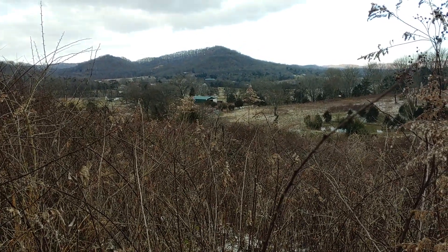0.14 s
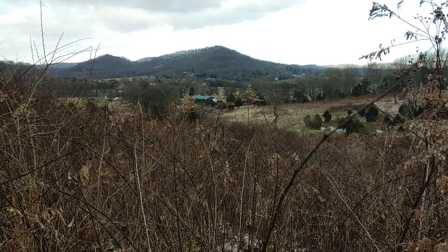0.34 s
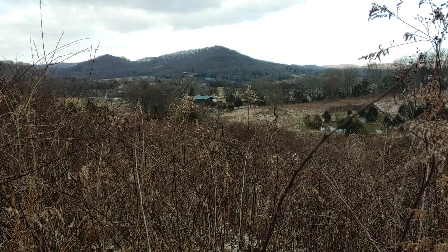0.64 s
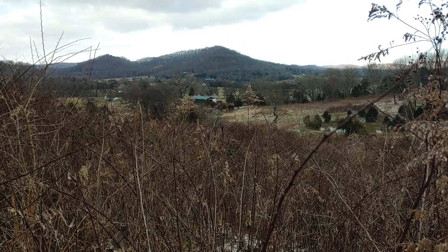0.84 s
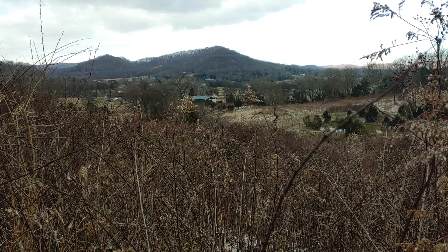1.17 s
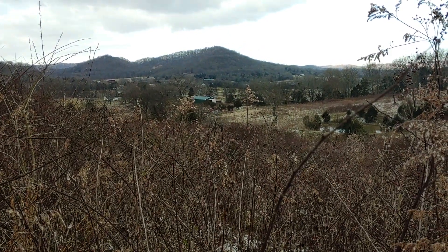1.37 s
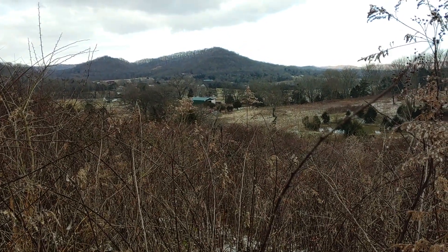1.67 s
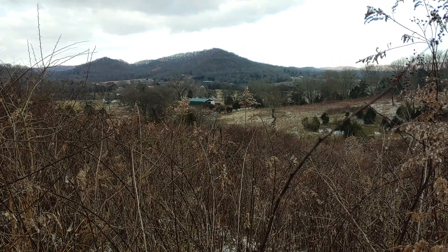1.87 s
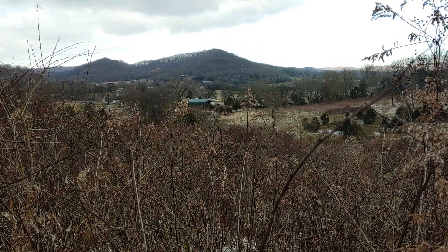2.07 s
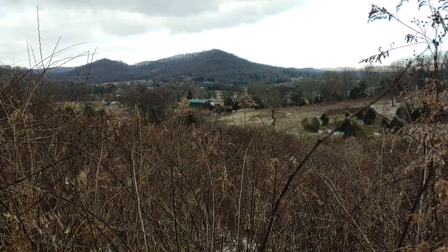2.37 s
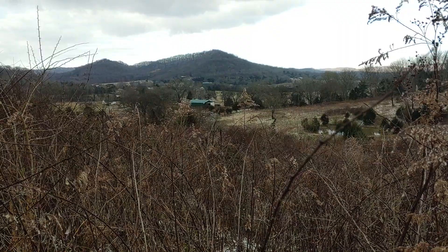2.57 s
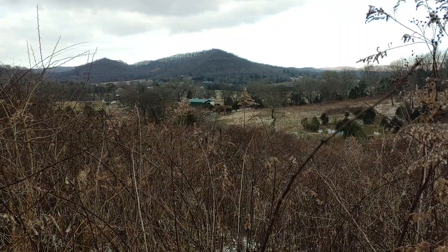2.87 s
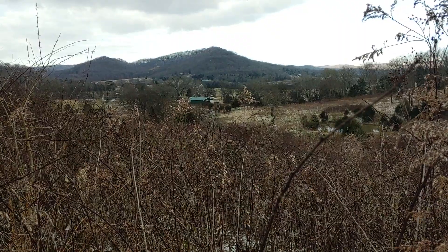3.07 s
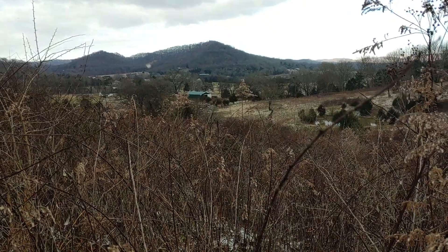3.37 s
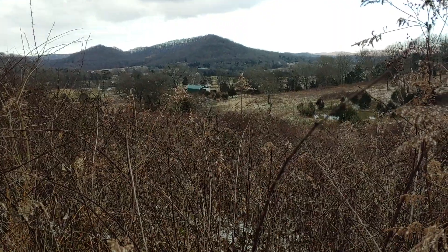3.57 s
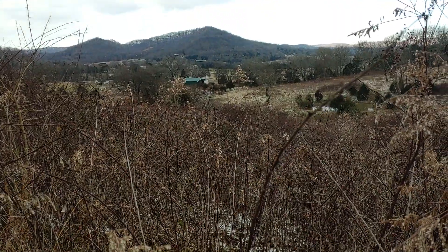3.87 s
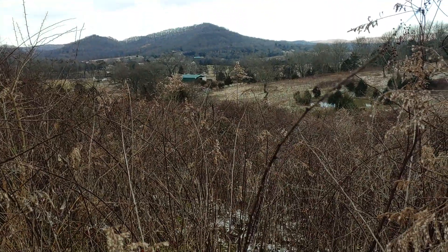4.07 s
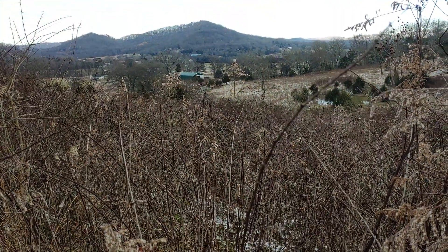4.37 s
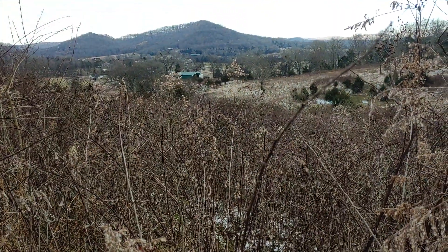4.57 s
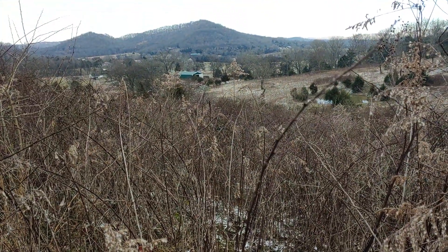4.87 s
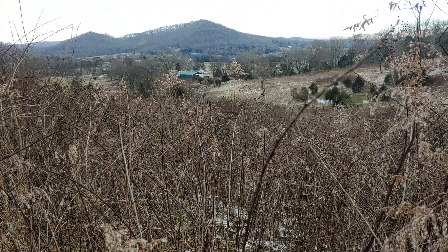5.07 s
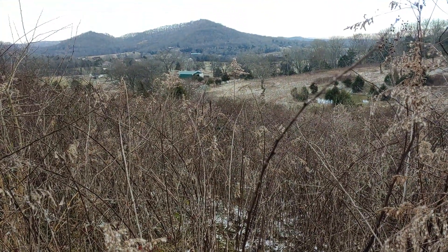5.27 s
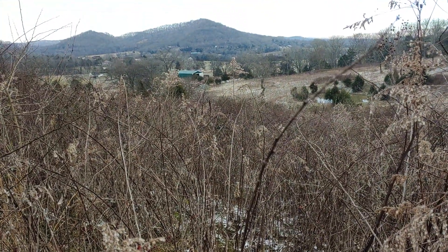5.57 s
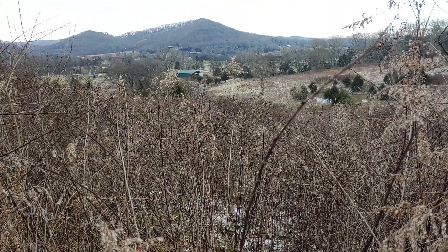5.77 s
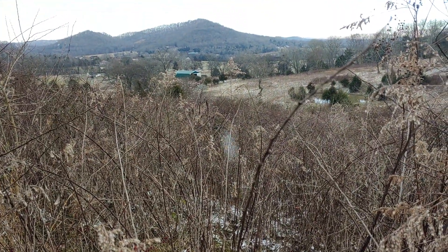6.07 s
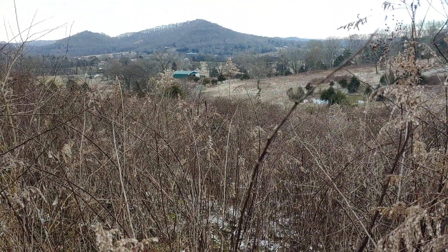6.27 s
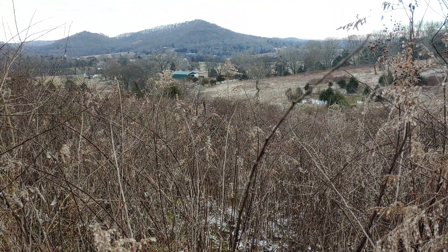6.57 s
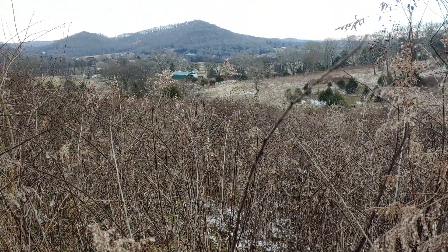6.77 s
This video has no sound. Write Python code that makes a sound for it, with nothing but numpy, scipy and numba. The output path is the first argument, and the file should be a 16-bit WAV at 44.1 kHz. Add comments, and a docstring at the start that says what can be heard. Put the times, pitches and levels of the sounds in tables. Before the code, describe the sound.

Drawn-out, increasingly hoarse baying from a dog echoes outdoors over dull thumps of wind on the microphone.

```python
"""A hound in a cold field

A hound bays seven times, growing hoarse: its vocal folds pulse unevenly and ring its throat and mouth.
The hills send back a long, dull echo. Gusts thump the left and right microphone openings separately.
Dry stalks rustle, tick and creak, and a small bird chirps once over the hush of distant air."""
import sys
import numpy as np
from scipy import signal
from scipy.fft import rfft, irfft, next_fast_len
from scipy.io import wavfile
from scipy.ndimage import uniform_filter1d
from numba import njit

SR = 44100
rng = np.random.default_rng(int(sys.argv[2]) if len(sys.argv) > 2 else 0)


def wav_record(signal):
    """Record a signal, one row per channel, as 16-bit PCM in the file named by sys.argv[1]."""
    frames = np.transpose(np.atleast_2d(signal))
    bounded = np.clip(frames, -1, 1)
    # unit amplitude maps onto the largest positive 16-bit level
    quanta = np.round(bounded * 32767).astype(np.int16)
    wavfile.write(sys.argv[1], SR, quanta)


N = 306054
TIME = np.arange(N) / SR

# One row a bay (a long bark): start/s, end/s, mouth/dB, growl/dB, ring/dB, whistle/dB, whistle rise/s,
# how far the ring follows the rasp/0-1, upper ring lift/dB, lower whistle lift/dB, palate strength
BAYS = [(0.828, 1.636, -10.5, -26.5, -9.5, -35.5, 0.17, 1, 1, 12, 0.023),
        (2.187, 2.848, -7.5, -18, -15, -34, 0.22, 0, 3, -3.5, 0.38),
        (3.214, 3.748, -6, -15.5, -15.5, -34.5, 0.33, 0.56, -0.5, -6.5, 0.86),
        (4.01, 4.663, -4.5, -9.5, -14.5, -38.5, 0.21, 0.26, -12.5, -4.5, 0.98),
        (5.056, 5.575, -5, -14, -6, -43.5, 0.061, 0.1, -12, 6.5, 0.71),
        (5.844, 6.129, -8.5, -10, -2.5, -31, 0.11, 0.08, -5.5, -1, 1.4),
        (6.894, 7.199, -8.5, -16.5, -11, -28, 0.064, 0.37, -1.5, -2, 2.9)]
# How hard the dog pushes, one list a bay: t/s, pitch/Hz, level/dB, rasp/dB, roughness (about 0-1)
BAY_EFFORT = [
    [(.855, 730.3, -28.5, -31, 0.46), (.91, 626.7, -21.5, -21, 0.54), (.99, 583.8, -24, -28.5, 0.55),
     (1.03, 662.5, -21.5, -15.5, 0.43), (1.12, 649, -24.5, -23, 0.53), (1.19, 527.9, -31.5, -23, 1.02),
     (1.3, 560, -28.5, -11, 0.73), (1.34, 656, -24, -14.5, 0.55), (1.41, 638, -25.5, -11, 0.46),
     (1.48, 549.4, -28.5, -16, 0.53), (1.51, 597, -31, -6.5, 0.26), (1.61, 541.7, -29.5, -33.5, 0.5)],
    [(2.21, 542, -28, -17.5, 0.77), (2.25, 599, -20.5, -20, 0.44), (2.47, 549.7, -22, -33, 0.57),
     (2.52, 600.5, -22.5, -24.5, 0.59), (2.69, 649.4, -21, -28.5, 0.51), (2.81, 546.8, -23.5, -20.5, 0.46)],
    [(3.24, 561.5, -25, -9.5, 0.57), (3.37, 547.5, -19.5, -20, 0.5), (3.49, 616.7, -22, -33, 0.66),
     (3.6, 574.4, -25.5, -22, 0.74), (3.71, 532.3, -34, -13, 0.79)],
    [(4.04, 602.6, -22, -19, 0.54), (4.1, 547.3, -23, -14, 0.55), (4.3, 559, -22, -24, 0.54),
     (4.4, 544, -25, -33.5, 0.5), (4.62, 513, -28.5, -17.5, 0.51)],
    [(5.1, 635.8, -27.5, -12.5, 0.65), (5.14, 541.6, -23.5, -45, 0.6), (5.2, 538, -30, -20, 0.56),
     (5.45, 517.2, -30.5, -26.5, 0.54), (5.55, 515.8, -35.5, -9, 0.75)],
    [(5.88, 541.6, -32, -17.5, 0.56), (5.95, 573, -24.5, -23.5, 0.65), (6.04, 518.8, -32.5, -20.5, 0.43),
     (6.1, 503, -55, -4, 0.55)],
    [(6.915, 571.7, -27.5, -14, 0.46), (6.94, 575, -34, -4.5, 0.86)],
]
# The moving jaw retunes the voice: t/s, mouth/Hz, rasp/Hz, lowest whistle/Hz
JAW_MOVES = [
    [(1.07, 1274, 1872, 4445), (1.18, 930, 1900, 4390), (1.32, 1006, 2061, 4130), (1.47, 1197, 1970, 4210)],
    [(2.25, 1205, 2110, 4180), (2.59, 892, 2010, 4020), (2.8, 1187, 2005, 4560)],
    [(3.26, 1234, 1976, 4100), (3.49, 917, 1978, 4390)],
    [(4.07, 1355, 1900, 4150), (4.35, 920, 1987, 4080), (4.6, 1133, 1988, 4080)],
    [(5.1, 1324, 2040, 4450), (5.2, 945, 2010, 4206)],
    [(5.9, 1154, 1973, 4110), (6.0, 1064, 1940, 3960)],
]
def hound():
    """A strong throat tone carries each bay; growl, mouth, rasp, ring and whistle colour it."""
    bays = np.array(BAYS)
    nearest = np.searchsorted((bays[1:, 0] + bays[:-1, 1]) / 2, TIME)
    (start_s, end_s, mouth_db, growl_db, ring_db, whistle_db,
     rise_s, follows, upper_db, lower_db, palate) = bays[nearest].T
    since_s, left_s = TIME - start_s, end_s - TIME
    pitch_hz, level_db, rasp_db, rough = in_time(np.concatenate(BAY_EFFORT))
    mouth_hz, rasp_hz, whistle_hz = in_time(np.concatenate(JAW_MOVES))
    starting, ending = fade(since_s, over_s=.02), fade(left_s, over_s=.038)
    jaw_shut, yelp = fade(since_s, over_s=.058), fade(since_s, over_s=.1)
    hoarse = np.minimum(TIME / 3.5, 1) ** 2
    clear = 1 - .8 * hoarse   # hoarseness blurs the growl and the yelp

    full_effort_db = -22.5
    slack_db = full_effort_db - level_db   # less effort brings out the mouth and the growl
    mouth_db = mouth_db + .42 * slack_db - 8 * jaw_shut
    growl_db = growl_db + .58 * slack_db + 23 * (rough - .37)
    ring_db = ring_db + full_effort_db + follows * (rasp_db - full_effort_db)
    # the whistle swells, then thins out as breath runs short
    whistle_db = whistle_db - 19 * fade(since_s, rise_s) - 7 * fade(left_s, over_s=.083)

    sung_hz = pitch_hz - 60 * starting   # each bay slides up to its note
    voice = throat(vocal_folds(sung_hz, np.clip(rough, 0, 1)))
    treble = band(voice, 2200, 6700)
    breathy = breathy_voice(voice, breath=1.3 * rough * hoarse)
    parts = (band(voice, 433, 812)
             + amp(growl_db) * growl(voice, pitch_hz, clear)
             + amp(mouth_db) * mouth(breathy, mouth_hz, palate)
             + amp(rasp_db) * rasp(voice, rasp_hz, yelp, clear)
             + amp(ring_db) * throat_ring(treble, since_s, upper_db + 5.5 * yelp)
             + amp(whistle_db) * whistle(treble, whistle_hz, lower_db))
    sounding = uniform_filter1d(1. * (since_s > 0) * (left_s > 0), size=200)
    return amp(level_db - 22 * starting - 17 * ending) * sounding * parts


def vocal_folds(pitch_hz, rough):
    """The folds let out shaky pulses of air, every other one weak, each with a puff of hiss."""
    shaky = 1 + rough * (.185 * rough * drift(119.3)[0] + .045 * drift(25)[0])
    phase = 2 * np.pi * np.cumsum(pitch_hz * shaky) / SR
    pulses = sum(np.cos(k * phase) for k in range(1, 12))
    half_pitch = np.cos(phase / 2)   # the strong-weak swing is also heard as a low tone
    strength = 1 + .52 * rough * half_pitch + .5 * rough * drift(390)[0]
    breath = rng.standard_normal(N) * (1 + np.cos(phase))
    return pulses * strength + .064 * half_pitch + 9.63 * rough ** 2 * breath


# What the throat lets through: f/Hz, level/dB
THROAT_COLOUR = [(260, -29), (430, -22.5), (540, 2.5), (710, -0.5), (1060, -15.5), (1600, -17), (1960, -31),
                 (7300, -44.5), (7800, -67.5)]
def throat(x):
    """The air in the throat and mouth boosts some overtones and muffles others."""
    return filtered(x, lambda hz: amp(at_hz(THROAT_COLOUR, hz)))


def growl(voice, pitch_hz, clear):
    """Uneven pulses gather into a low growl at half the pitch."""
    return peaked(band(voice, 194, 395), pitch_hz / 2, width_hz=50, peak=3 * clear)


def breathy_voice(voice, breath):
    """Hoarse breath mixes into the middle range of the voice."""
    return band(band(voice, 839, 1600) + breath * band(rng.standard_normal(N), 800, 1586), 833, 1633)


def mouth(x, mouth_hz, palate):
    """The palate (roof of the mouth) rings at one pitch; the mouth's own ring moves with the jaw."""
    palate_ring = resonance(resonance(x, 1617, 130), 1617, 130)
    return peaked(x + 2 * palate * palate_ring, mouth_hz, width_hz=200, peak=.79)


def rasp(voice, rasp_hz, yelp, clear):
    """A harsh ring starts high and drops, so the bay opens with a yelp."""
    peak = 1.3 * (1 + 6 * yelp * clear)
    return peaked(band(voice, 1705, 2403), rasp_hz + 450 * yelp, width_hz=130, peak=peak)


# Where the upper throat rings: f/Hz, width/Hz, level/dB
RING_PEAKS = [(2886, 130, 9.5), (3349, 180, 0.5)]
def throat_ring(treble, since_s, upper_db):
    """The upper throat rings at two pitches; the lower sinks through each bay."""
    sag = 1 - .07 * np.clip(since_s, 0, 1)
    return cavities(treble, RING_PEAKS, sway_db=2.5, lifts_db=[0, upper_db], shifts=[sag, 1])


# Where the teeth and nose whistle: f/Hz, width/Hz, level/dB
WHISTLE_PEAKS = [(4050, 250, -2.5), (4800, 320, -6), (5350, 180, -25), (6280, 600, 8.5)]
def whistle(treble, lowest_hz, lower_db):
    """Breath whistles through teeth and nose; the jaw moves the two lowest pitches."""
    shift = lowest_hz / WHISTLE_PEAKS[0][0]
    lifts_db = [lower_db, lower_db, lower_db, 0]
    return cavities(treble, WHISTLE_PEAKS, sway_db=3, lifts_db=lifts_db, shifts=[shift, shift, 1, 1])


def cavities(x, peaks, sway_db, lifts_db, shifts):
    """Small air pockets ring sharply, each wandering in pitch and loudness."""
    sways = sway_db * drift(7.4, channels=len(peaks))
    wanders = 1 + .01 * drift(6.8, channels=len(peaks))
    out = 0
    for (hz, width, db), sway, wander, lift_db, shift in zip(peaks, sways, wanders, lifts_db, shifts):
        now_hz = hz * wander * shift
        out = out + amp(db + sway + lift_db) * glide(glide(x, now_hz, width), now_hz, width)
    return rms_one(out)


def peaked(x, hz, width_hz, peak):
    """Add a moving ring to x; both flutter as the folds slap unevenly."""
    ring = glide(glide(x, hz, width_hz), hz, width_hz)
    return rms_one((x + peak * ring) * amp(.84 * drift(48)[0]))


# Echoes from near and far slopes: delay/s, level/dB
ECHO_SHAPE = [(0.022, -24), (0.151, -17), (0.401, -23), (0.7, -30), (1.1, -53.5), (1.4, -68.5)]
# The echo's dull tone: f/Hz, level/dB
ECHO_TONE = [(200, -11), (420, 4.5), (520, -3.5), (660, 0.5), (1600, -12.5), (1800, -2), (2800, -12.5),
             (7000, -20)]
def hill_echo(x):
    """Countless reflections come back, fluttering in the restless air and dulled by the long trip."""
    fluttering = x * (.62 + .42 * drift(57)[0])
    delay_s, db = np.transpose(ECHO_SHAPE)
    shape = amp(np.interp(TIME, delay_s, db, left=-200, right=-200)) * np.sqrt(2 / SR)
    shared, separate = rng.standard_normal(N), rng.standard_normal((2, N))
    reflections = rfft(shape * (.25 * shared + 2.69 * separate), next_fast_len(N + 2 * SR))
    return filtered(fluttering, lambda hz: reflections * amp(at_hz(ECHO_TONE, hz)))


# How much louder the left side is: f/Hz, left minus right/dB
LEFT_LOUDER = [(300, 1.5), (450, -4), (950, -2), (1220, -6.5), (1570, 2.5), (2020, 14.5), (2600, 3),
               (4500, 2.5), (8000, 6.5)]
# How far the left side's wave runs ahead: f/Hz, lead/radians
LEFT_AHEAD = [(260, 0.26), (1030, 0.38), (1550, 0.98), (2240, 0.15), (4300, -1.5)]
def direct_path(x):
    """Two bounces cancel narrow bands; the microphone's body shades and delays one side."""
    def response(hz):
        lead = np.interp(hz, *np.transpose(LEFT_AHEAD), left=0)
        left = amp(at_hz(LEFT_LOUDER, hz) / 2) * np.exp(.5j * lead)
        ground = dip(hz, centre_hz=1745, width_hz=53, db=-17.5)
        brush = dip(hz, centre_hz=2490, width_hz=130, db=-10)
        return ground * brush * np.array([left, 1 / left])
    return filtered(x, response)


# The wind's rise and fall: t/s, level/dB, left minus right/dB
WIND_GUSTS = [(0, -54, -20), (.27, -59, 31), (.58, -56, -46), (.68, -79.5, -6), (2.68, -65.5, -0.5),
              (2.95, -41.5, -23), (3.23, -38.5, 34), (3.36, -42.5, -2), (3.5, -23, -7.5), (3.8, -37, 10),
              (4.06, -28.5, 3.5), (4.33, -43, -21.5), (4.42, -64, -5.5), (4.7, -36.5, 32.5),
              (5.26, -73.5, -1), (5.5, -51, -1.5), (5.68, -42, 40.5), (5.9, -29, 10), (6.05, -37, -3),
              (6.43, -73, 31.5), (6.64, -52.5, 16), (6.94, -72, 10)]
# The tone of its rumble: f/Hz, level/dB
RUMBLE_TONE = [(20, -24.5), (40, -3.5), (70, 1), (110, -4.5), (180, -17.5), (300, -33.5), (600, -51.5)]
# Hard swirls of air: t/s, level/dB, left minus right/dB, f/Hz
WIND_THUMPS = [(0.171, -46.5, 25, 150), (0.255, -42, 22, 132), (3.29, -11, -11.5, 75.07),
               (3.404, -11, -36, 81.5), (3.627, -13.5, 33, 119.9), (3.96, -7, 29, 141.1),
               (4.047, -19, -16, 79.9), (4.668, -13, 39.5, 151.3), (5.593, -25.5, 35, 141.5),
               (5.759, -14, 57, 139.9), (5.886, -9.5, 46, 139.3), (5.959, -16, 26, 141.7)]
def wind():
    """Air swirling at each opening rumbles, higher in stronger gusts; the hardest swirls thump."""
    level_db, pan_db = in_time(WIND_GUSTS)
    side_db = level_db + np.array([pan_db / 2, -pan_db / 2])
    noise = coloured(RUMBLE_TONE, alike=.006)
    deep = signal.sosfiltfilt(signal.butter(2, 70, fs=SR, output="sos"), noise)
    rumble = noise - deep + amp(-.3 * (side_db + 23.5)) * deep
    out = amp(side_db + 4.14 * drift(33, channels=2)) * rumble
    t = TIME[:6000]
    swell = t / .0091 * np.exp(1 - t / .01)
    for s, db, pan_db, hz in WIND_THUMPS:
        at = round(s * SR)
        wobbly_time = np.cumsum(1 + 3.5 * uniform_filter1d(rng.standard_normal(len(t)), size=200)) / SR
        thump = swell * np.sin(2 * np.pi * hz * wobbly_time)
        out[:, at:at + len(t)] += panned(amp(db - abs(pan_db) / 2) * thump, pan_db)
    return signal.sosfilt(signal.butter(4, 500, fs=SR, output="sos"), out)


# Where dry stems ring: f/Hz, width/Hz, level/dB
STEM_PEAKS = [(2200, 340, -17), (3920, 1300, 11.5), (6245, 260, 14.5)]
# Sharp ticks that strike the stems: t/s, level/dB
STEM_TICKS = [(4.7497, -63), (5.9416, -46.5), (6.789, -57), (6.9272, -43.5)]
def stalks():
    """Slowly growing rubbing and a few ticks ring the same dry stems; each tick also snaps brightly."""
    rub_db = -91.5 + 2.5 * TIME
    rub = rng.standard_normal((2, N)) * amp(rub_db + 2.8 * drift(40))
    ticks = np.zeros((2, N))
    for s, db in STEM_TICKS:
        at = round(s * SR)
        tick = rng.standard_normal(400) * np.exp(-TIME[:400] / .0036)
        ticks[:, at:at + 400] += panned(amp(db) * tick, db=15.5)
    ringing = sum(amp(db) * resonance(rub + ticks, hz, width) for hz, width, db in STEM_PEAKS)
    snap = amp(-9) * resonance(resonance(ticks, 8500, 5500), 8500, 5500)
    return signal.sosfilt(signal.butter(6, 7300, fs=SR, output="sos"), ringing) + snap


# One short creak: t/s, slip rate/Hz, level/dB
STEM_CREAK = [(6.605, 470, -82), (6.615, 470, -43.5), (6.628, 468, -55), (6.638, 465, -75)]
def creak():
    """A stalk sticks and slips so evenly that it buzzes."""
    slip_hz, db = in_time(STEM_CREAK)
    phase = 2 * np.pi * np.cumsum(slip_hz) / SR
    buzz = sum(np.cos(k * phase) * amp(-2.5 * k) for k in range(2, 6))
    return amp(db) * buzz * during(STEM_CREAK)


# One faint chirp: t/s, f/Hz, level/dB
BIRD_CHIRP = [(6.5, 3326, -71), (6.52, 3375, -68), (6.526, 4054, -64), (6.555, 4070, -75)]
def bird():
    """A small bird whistles one pure, rising note."""
    hz, db = in_time(BIRD_CHIRP)
    return amp(db) * np.sin(2 * np.pi * np.cumsum(hz) / SR) * during(BIRD_CHIRP)


# The tone of the open field: f/Hz, level/dB
FIELD_TONE = [(60, -9), (134, -5), (350, -22), (600, -23), (1100, -25.5), (2400, -41), (4000, -64.5),
              (6300, -47), (7600, -64), (10000, -80.5)]
def distant_air():
    """Far-off air and weeds make a soft, nearly steady hush."""
    return amp(-63 + .77 * drift(3.4)) * coloured(FIELD_TONE, alike=.57)


def amp(db):
    """Turn decibels into a multiplier."""
    return 10 ** (np.asarray(db) / 20)


def rms_one(x):
    """Scale to an average strength (rms) of 1."""
    return x / np.sqrt(np.mean(x ** 2) + 1e-20)


def fade(seconds, over_s):
    """Fall in a straight line from 1 to 0."""
    return np.clip(1 - seconds / over_s, 0, 1)


def during(rows):
    """True between a table's first and last times."""
    return (TIME > rows[0][0]) & (TIME < rows[-1][0])


def in_time(rows):
    """Join a table's points into curves over time."""
    s, *columns = np.transpose(rows)
    return [np.interp(TIME, s, c) for c in columns]


def at_hz(points, hz):
    """Read a tone table between its points, with octaves evenly spaced."""
    f, db = np.transpose(points)
    return np.interp(np.log(hz + 1), np.log(f + 1), db)


def filtered(x, response):
    """Scale each frequency in x by response(hz)."""
    size = next_fast_len(N + 2 * SR)
    return irfft(rfft(x, size) * response(np.fft.rfftfreq(size, 1 / SR)), size)[..., :N]


def drift(rate_hz, channels=1):
    """A smooth random wobble with a typical size of 1."""
    r = np.exp(-2 * np.pi * rate_hz / SR)
    slow = signal.lfilter([1], [1, -2 * r, r * r], rng.standard_normal((channels, N + SR)))
    return rms_one(slow[:, SR:])


def coloured(tone, alike):
    """Stereo noise with the given tone; alike is the share both sides have in common."""
    white = np.sqrt(alike) * rng.standard_normal(N) + np.sqrt(1 - alike) * rng.standard_normal((2, N))
    return rms_one(filtered(white, lambda hz: amp(at_hz(tone, hz))))


def resonance(x, hz, width_hz):
    """Let x ring at one frequency; narrower rings longer."""
    r = np.exp(-np.pi * width_hz / SR)
    feedback = [1, -2 * r * np.cos(2 * np.pi * hz / SR), r * r]
    return signal.lfilter(np.array([1, 0, -1]) * (1 - r * r) / 2, feedback, x)


@njit
def glide(x, hz, width_hz):
    """A resonance whose frequency moves."""
    y, r = np.zeros(len(x)), np.exp(-np.pi * width_hz / SR)
    for i in range(2, len(x)):
        push = (1 - r * r) / 2 * (x[i] - x[i - 2])
        y[i] = push + 2 * r * np.cos(2 * np.pi * hz[i] / SR) * y[i - 1] - r * r * y[i - 2]
    return y


def band(x, low_hz, high_hz):
    """Keep one range of frequencies and hold its strength near 1."""
    y = signal.sosfilt(signal.butter(3, [low_hz, high_hz], "band", fs=SR, output="sos"), x)
    return y / np.sqrt(uniform_filter1d(y ** 2, size=2600) + 1e-12)


def dip(hz, centre_hz, width_hz, db):
    """A multiplier that turns down one narrow band."""
    return amp(db / (1 + (2 * (hz - centre_hz) / width_hz) ** 2))


def panned(x, db):
    """Make x stereo, with the left side louder by db."""
    return np.array([x * amp(db / 2), x * amp(-db / 2)])


def scene():
    """Everything that reaches the microphone; only the hound echoes."""
    dog, air = hound(), distant_air()
    return direct_path(dog + creak() + bird()) + hill_echo(dog) + wind() + stalks() + air


def record(dry):
    """The microphone's amplifier adds a steady dull hiss; the highest treble is cut."""
    hiss = amp(-85.5) * signal.lfilter([1], [1, -.7], rng.standard_normal((2, N)))
    return signal.sosfilt(signal.cheby2(12, 70, 15700, fs=SR, output="sos"), dry + hiss)


dry = scene()
out = record(dry)
wav_record(out)
```